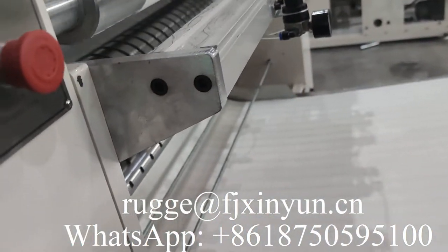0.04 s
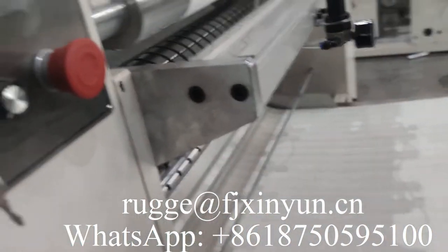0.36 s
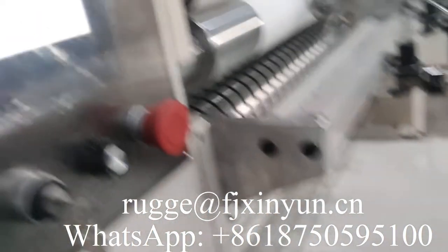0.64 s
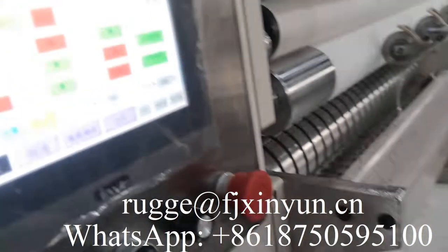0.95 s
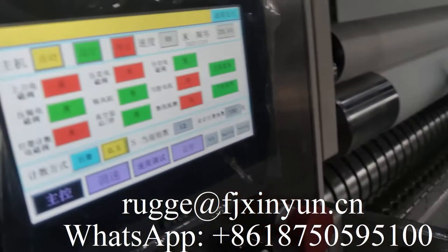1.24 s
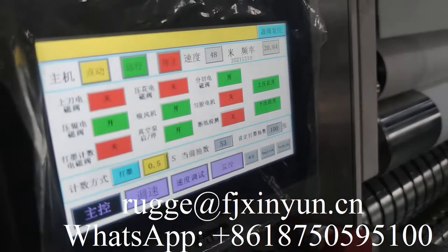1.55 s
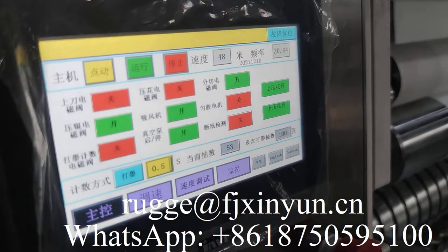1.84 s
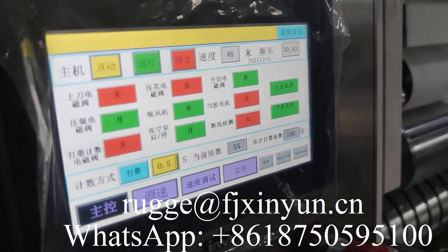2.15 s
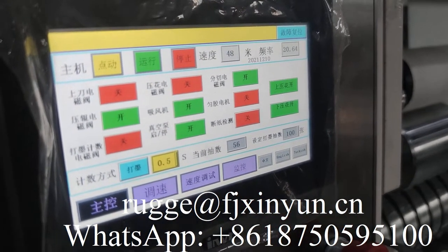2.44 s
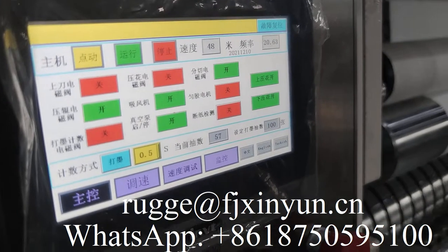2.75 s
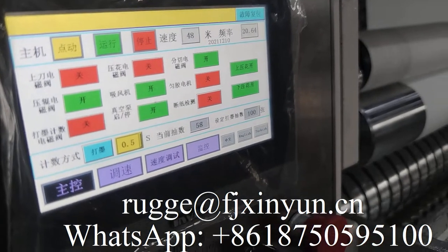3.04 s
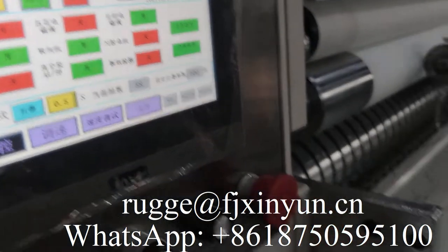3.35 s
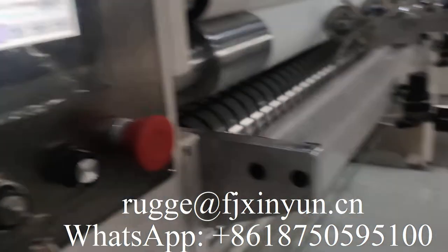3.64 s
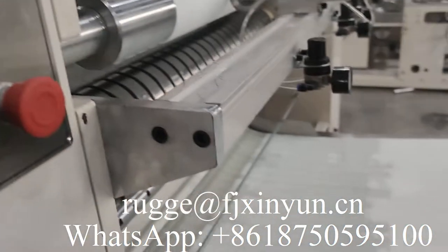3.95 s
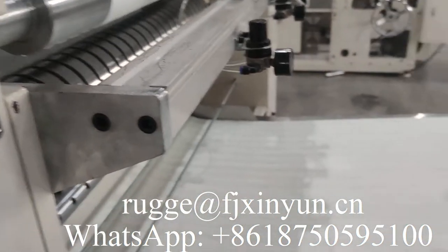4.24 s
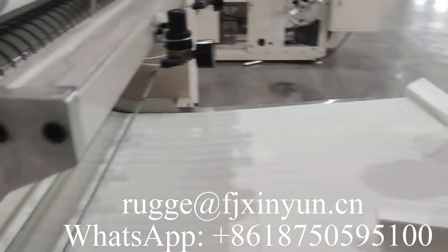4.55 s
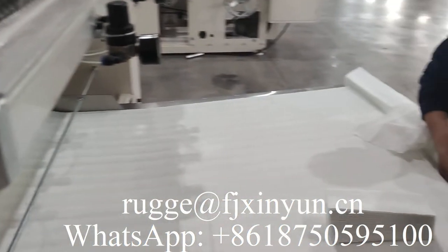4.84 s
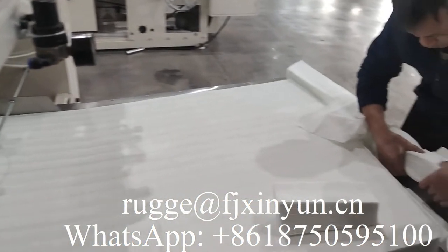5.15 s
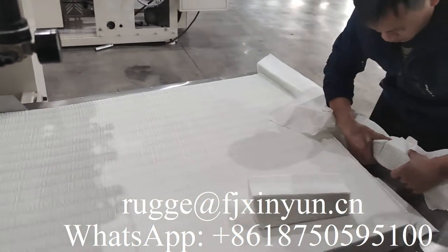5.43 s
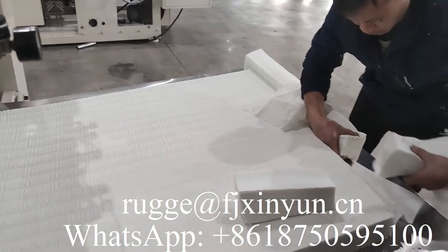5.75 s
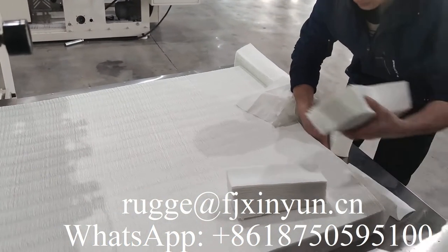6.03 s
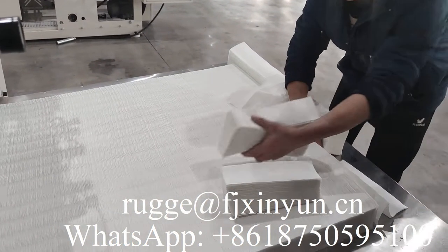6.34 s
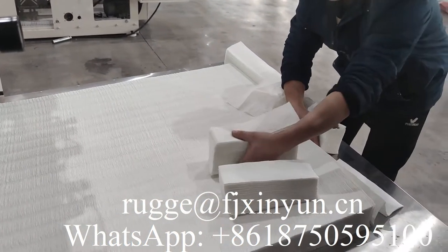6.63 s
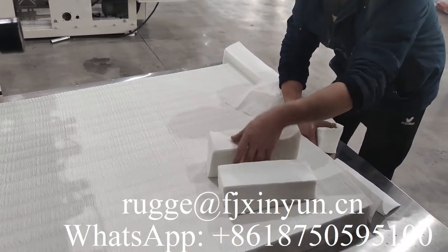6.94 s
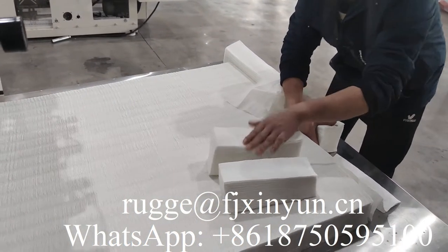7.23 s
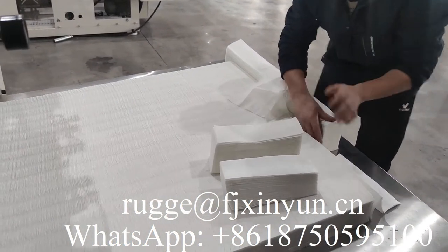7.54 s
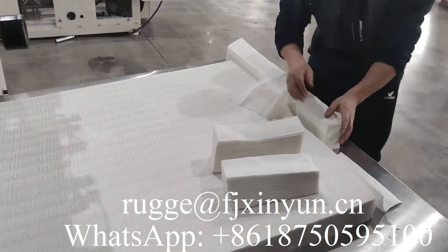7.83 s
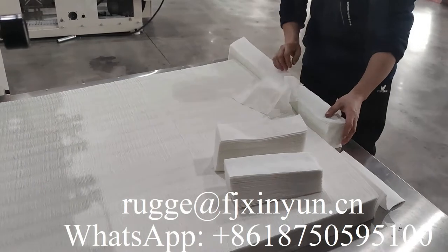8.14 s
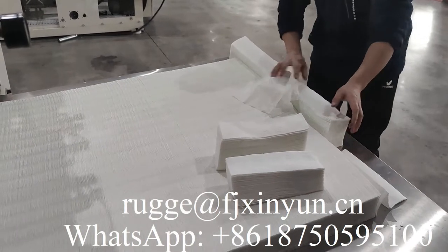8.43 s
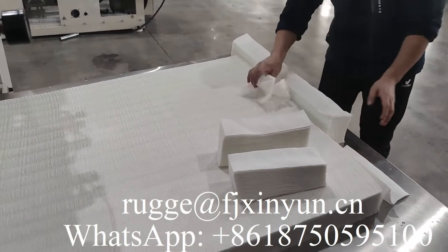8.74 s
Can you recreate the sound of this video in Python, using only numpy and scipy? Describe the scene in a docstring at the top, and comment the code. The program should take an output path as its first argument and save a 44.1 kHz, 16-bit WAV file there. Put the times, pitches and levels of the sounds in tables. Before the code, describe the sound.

A paper towel folding machine runs loudly in a factory, with a droning blower, rhythmic clacking and pulsing air hiss.

```python
"""A droning vacuum blower and sheets slapping down 3.5 times a second: a paper towel folder in a hall.
On each turn of the folding rollers the valve gear knocks, air spits from the suction holes, and the
vacuum port opens with a rush and shuts with a click. Paper catching on steel squeals now and then.
The listening phone, hand-held, ducks behind the control panel, comes out and turns to the table."""
import sys
import numpy as np
from scipy import signal
from scipy.fft import rfft, irfft
from scipy.io import wavfile
from scipy.ndimage import uniform_filter1d

SR = 44100
rng = np.random.default_rng(int(sys.argv[2]) if len(sys.argv) > 2 else 0)


def master_out(mix):
    """Clip the mix to full scale and print it as 16-bit PCM to the path in sys.argv[1]."""
    frames = np.transpose(np.atleast_2d(mix))
    ceiling = np.clip(frames, -1, 1)
    pcm = np.round(ceiling * 32767).astype(np.int16)
    wavfile.write(sys.argv[1], SR, pcm)


N = 396018
T = np.arange(N) / SR
FOLD_S, FIRST_FOLD_S = .286153, .159


def undb(db):
    """Decibels to gain."""
    return 10 ** (np.asarray(db) / 20)


def unit(x):
    """Scale to rms 1."""
    return x / np.sqrt(np.mean(x ** 2))


def colour(x, points):
    """Filter by a spectrum of (f/Hz, gain/dB) points."""
    hz, db = np.transpose(points)
    f = np.maximum(np.arange(N // 2 + 1) * SR / N, 1)
    return irfft(rfft(x) * undb(np.interp(np.log(f), np.log(hz), db)), N)


def ring(x, hz, width_hz):
    """One resonance, gain 1 at its centre."""
    return signal.lfilter(*signal.iirpeak(hz, hz / width_hz, fs=SR), x)


def walk(rate_hz):
    """Smooth random wander, rms 1."""
    k = int(SR / rate_hz)
    steps = np.repeat(rng.standard_normal(N // k + 1), k)
    return unit(uniform_filter1d(uniform_filter1d(steps, k), k)[:N])


def diffuse(alike_hz=620):
    """Noise from all around, 0 dB per Hz: the microphones share the bass, not the treble."""
    f = np.arange(N // 2 + 1) * SR / N
    alike = np.exp(-(f / alike_hz) ** 2)
    mid, side = rfft(rng.standard_normal((2, N)))
    mid, side = mid * np.sqrt(1 + alike), side * np.sqrt(1 - alike)
    return irfft(np.array([mid + side, mid - side]), N) * np.sqrt(SR) / 2


def hiss(hz, width_hz):
    """Noise in one steep-sided resonance, rms 1."""
    return unit(ring(ring(rng.standard_normal(N), hz, 1.7 * width_hz), hz, 1.7 * width_hz))


def blows(per_s):
    """Random unit impacts."""
    return rng.choice([-1, 1], N) * (rng.random(N) < per_s / SR)


def tone(hz, wobble):
    """Slightly unsteady sine, rms 1."""
    return np.sqrt(2) * np.sin(2 * np.pi * np.cumsum(hz * (1 + wobble * walk(120))) / SR)


def burst(t, rise_s, fall_s):
    """Gaussian swell peaking at t = 0."""
    return np.exp(-(t / np.where(t < 0, rise_s, fall_s)) ** 2 / 2)


def since(at_s):
    """Signed time from the nearest passing of one point of the rollers' turn."""
    return (T - FIRST_FOLD_S - at_s + FOLD_S / 2) % FOLD_S - FOLD_S / 2


def stereo(x, lag_s):
    """Direct sound reaches the right microphone later."""
    return np.array([x, np.interp(T - lag_s, T, x)])


def blower(standing_db, lag_s, shaft_hz=74.72, waver_db=0.57):
    """Two lobes push air twice a turn; the lines swell or fade as the phone crosses standing waves."""
    # drone lines: multiple of shaft rate, rms level/dB, share of standing-wave change
    lines = [(1, -46.5, -1.8), (1.5, -36.5, -0.29), (2, -12.5, -0.0066), (3, -57, 0), (3.3, -36.5, 0.085),
             (4, -14.5, 1), (5, -42, -1.1), (6, -41.5, -0.26), (7, -44, -0.26)]
    angle = np.pi / 6 + 2 * np.pi * np.cumsum(shaft_hz * (1 + 0.00046 * walk(5.37))) / SR
    drone = sum(undb(db + share * standing_db + waver_db * walk(12)) * np.cos(multiple * angle)
                for multiple, db, share in lines)
    return stereo(np.sqrt(2) * drone, .00013 + 0.15 * lag_s)


def drive(swell_db=1.7, flutter_db=0.74, split_hz=900):
    """Rollers, belts and other machines rumble; the bass swells, the treble stays more even."""
    # rumble spectrum: f/Hz, density/dB
    spectrum = [(20, -72), (40, -63.5), (65, -50), (110, -51.5), (180, -47), (260, -45.5), (350, -53),
                (480, -57), (720, -57), (900, -60.5), (1600, -59.5), (2600, -57.5), (5000, -63),
                (16000, -89.5)]
    rumble = colour(diffuse(), spectrum)
    bass = signal.sosfiltfilt(signal.butter(2, split_hz, fs=SR, output="sos"), rumble)
    return bass * undb(swell_db * walk(18)) + (rumble - bass) * undb(flutter_db * walk(30))


def air(turbulence_db=0.7, mid_open_s=0.1522, half_open_s=0.029, gulp_db=-56, covered_db=-3):
    """Steady leaks, spits from the suction holes and the rush through the open vacuum port."""
    # spits: t in turn/s, rise/s, fall/s, level/dB
    spits = [(0.083, 0.035, 0.036, 3.5), (.124, 0.0039, 0.016, 2.5), (.257, 0.019, 0.016, 1)]
    # spectra of leak, spit and port rush: f/Hz, density/dB
    leak_spectrum = [(900, -71), (1600, -65), (2100, -51), (2800, -61.5), (3900, -59.5), (4800, -62),
                     (6300, -70), (8000, -63.5), (12000, -65.5), (16000, -87)]
    spit_spectrum = [(1500, -94), (4000, -62.5), (6500, -71), (8500, -63.5), (12000, -66.5), (16000, -85.5)]
    rush_spectrum = [(1200, -75), (2000, -62.5), (2800, -94), (4000, -62), (4800, -60.5), (6500, -60),
                     (8500, -66), (11000, -91), (16000, -84)]
    spit_power = sum((undb(db) * burst(since(at), rise, fall)) ** 2 for at, rise, fall, db in spits)
    t = since(mid_open_s)
    port_open = np.clip((half_open_s - abs(t)) / 0.0057, 0, 1)
    # as the vacuum is spent, the bright rush gives way to a lower gulp
    rush = undb(-45 * t) * colour(diffuse(), rush_spectrum)
    gulp = undb(gulp_db + 27 * t) * ring(diffuse(), 2680, 930)
    # the leak is covered just before the port opens
    leak = colour(diffuse(), leak_spectrum) * undb(covered_db * burst(since(0.12), 0.058, .008))
    spit = np.sqrt(spit_power) * colour(diffuse(), spit_spectrum)
    turbulence = undb(turbulence_db * walk(400) + 0.25 * walk(10))
    return (leak + spit + port_open * (rush + gulp)) * turbulence


def gap_ring(width_hz):
    """Noise ringing in the gap behind the panel, rms 1; the pitch falls as the phone moves along it."""
    # gap resonance: t/s, f/Hz
    glide = [(.9, 1640), (3.6, 1560), (4.3, 1250)]
    angle = 2 * np.pi * np.cumsum(np.interp(T, *np.transpose(glide))) / SR
    lowpass = signal.butter(2, width_hz / 2, fs=SR, output="sos")
    in_phase, quadrature = signal.sosfilt(lowpass, rng.standard_normal((2, N)))
    return unit(in_phase * np.cos(angle) + quadrature * np.sin(angle))


def rollers(air_db, gap_db, whirr_db=-34, chink_db=-34.5, whistle_db=-22.5, flicker_db=2.8):
    """Paper runs over the rollers, combs chink in their grooves, each leaving sheet whistles."""
    # resonances of rollers and steel combs: f/Hz, width/Hz, level/dB
    roller_modes = [(500, 390, -34.5), (704, 170, -36.5), (1020, 280, -36.5)]
    comb_modes = [(2020, 110, -2), (2160, 250, 0), (2316, 80, 3), (2424, 66, -14.5)]
    run = sum(undb(db + flicker_db * walk(30)) * hiss(hz, width) for hz, width, db in roller_modes)
    whirr = undb(whirr_db + gap_db) * gap_ring(width_hz=330)
    chinks = unit(sum(undb(db) * ring(ring(blows(per_s=330), hz, width), hz, 8 * width)
                      for hz, width, db in comb_modes))
    whistle = undb(whistle_db) * burst(since(0.049), rise_s=.019, fall_s=.022) * hiss(3745, 190)
    return run + whirr + undb(air_db) * (undb(chink_db) * chinks + whistle)


def web(level_db=-33, lag_s=0.00046):
    """The paper web rustles from the left."""
    return stereo(undb(level_db + 1.3 * walk(25)) * hiss(1320, 350), lag_s)


def whine(level_db=-47):
    """Faint steady whine of the drive."""
    return undb(level_db) * tone(hz=2804, wobble=0.00397)


def valve(scatter_db=1, jitter_s=0.00046, attack_s=0.00029):
    """The valve gear knocks at the same points of every turn; each knock rings briefly."""
    # knocks: t in turn/s, f/Hz, t60/s, level/dB
    knocks = [(.088, 473, 0.025, -16), (.1865, 2140, 0.02, -15), (.190, 1256, 0.064, -22)]
    out = np.zeros(N)
    turns = np.arange(-1, N / SR / FOLD_S)
    for at, hz, t60, db in knocks:
        for turn, (late, size, detune) in zip(turns, rng.standard_normal((len(turns), 3))):
            start = int((FIRST_FOLD_S + turn * FOLD_S + at + jitter_s * late) * SR)
            if 0 <= start < N:
                t = T[:min(SR // 10, N - start)]
                envelope = undb(db + scatter_db * size - 60 * t / t60) * (1 - np.exp(-t / attack_s))
                ringing = np.sin(2 * np.pi * hz * (1 + 0.02 * detune) * t)
                out[start:start + len(t)] += 2 * envelope * ringing
    return out


def slaps(level_db, gap_db, at_s=.049, jitter_s=.002, boom_db=0.3, crack_db=-12.5, tail_db=-5):
    """Once a turn a sheet lands: small blows boom between the rollers and ring behind the panel."""
    # slap resonances: f/Hz, width/Hz, relative level/dB
    slap_modes = [(527, 290, -3.5), (750, 250, 3.5), (952, 220, -0.5), (1280, 280, -10)]
    level_scatter_db, crack_scatter_db, mode_scatter_db = 1.1, 3, 3
    flurry = blows(per_s=3200)
    modes = np.array([undb(db) * ring(ring(flurry, hz, width), hz, 3 * width)
                      for hz, width, db in slap_modes])
    gap_noise = gap_ring(width_hz=260) * undb(crack_db + gap_db)
    out = np.zeros(N)
    landings_s = np.arange(FIRST_FOLD_S + at_s, N / SR, FOLD_S)
    sheets = rng.standard_normal((len(landings_s), 3))
    spots = rng.standard_normal((len(landings_s), len(modes)))
    for landing_s, (late, size, bright), spot in zip(landings_s, sheets, spots):
        near = abs(T - landing_s) < FOLD_S / 2
        t = T[near] - landing_s - jitter_s * late
        hit = burst(t + 0.0026, rise_s=0.009, fall_s=0.014)
        tail = undb(tail_db) * burst(t - .005, rise_s=0.025, fall_s=0.028)
        envelope = np.hypot(hit, tail)
        # the landing spot sets the mix of resonances, not their total energy
        boom = undb(mode_scatter_db * spot) @ modes[:, near]
        boom *= undb(boom_db) / np.sqrt(np.average(boom ** 2, weights=envelope ** 2))
        crack = undb(crack_scatter_db * bright) * gap_noise[near]
        out[near] += undb(level_scatter_db * size) * envelope * (boom + crack)
    return out * undb(level_db)


def squeals():
    """Paper catches briefly on the steel."""
    # catches: t/s, f/Hz, half length/s, level/dB
    catches = [(1.49, 3330, 0.016, -31), (7.183, 2270, .028, -29), (8.034, 2280, .022, -27)]
    return sum(undb(db) * burst(T - at, half_s, half_s) * tone(hz, wobble=0.0065)
               for at, hz, half_s, db in catches)


def hall(x, level_db=-11, t60_s=0.067):
    """Reflections off machine frame, table and floor die away quickly."""
    t = T[:SR]
    echo = diffuse()[:, :SR] * undb(-60 * t / t60_s) * (t > .002)
    echo /= np.sqrt(np.sum(echo ** 2) / 2)
    return undb(level_db) * signal.fftconvolve(x[None], echo, axes=1)[:, :N]


def scene():
    """The panel shades air and slaps and rings in its gap; turning lifts the hiss, thins the drone."""
    # phone behind the control panel: t/s, hidden/0-1
    ducking = [(.6, 0.14), (1.25, 1), (3.1, 0.93), (3.8, 0)]
    # swing from rollers to delivery table: t/s, turned/0-1
    swing = [(3.9, 0.06), (4.4, 0.2), (4.9, 0.74), (5.4, 1)]
    hidden = np.interp(T, *np.transpose(ducking))
    turned = np.interp(T, *np.transpose(swing))
    air_db = -4 - 1.7 * hidden + 4 * turned
    gap_db = 0.5 + 4 * hidden - 17 * turned
    slap_db = -16.5 - 3 * hidden - 0.15 * turned
    standing_db = 0.47 - 4 * turned
    lag_s = .00012 + 0.00033 * turned
    shadow_db = 3 * turned  # the phone's body shades the right microphone from the slaps
    balance = undb(np.array([[.5], [-.5]]) * shadow_db)
    sheets = slaps(slap_db, gap_db)
    running = valve() * undb(0.9 * air_db) + rollers(air_db, gap_db) + squeals() + whine()
    direct = stereo(sheets, lag_s) * balance + stereo(running, lag_s) + web()
    echoes = hall(sheets + running)
    return blower(standing_db, lag_s) + direct + echoes + air() * undb(air_db) + drive()


def record(dry, top_hz=15900):
    """Each microphone port colours the treble; peaks clip at full scale and the top is cut."""
    # port responses: f/Hz, gain/dB
    left_port = [(900, 0), (2000, -4), (3800, -6.5), (5000, -3), (6300, -4), (7100, 6), (8100, 11),
                 (9000, 6.5), (10000, 6.5), (11200, 2), (11900, 9), (13000, 8.5), (15500, 15.5)]
    right_port = [(900, 0), (2000, 0), (5000, 0.5), (6300, 0), (7100, -8), (8200, -16), (9300, -8.5),
                  (11500, -7.5), (13000, -2.5), (14000, 12), (15500, 11)]
    heard = np.array([colour(dry[0], left_port), colour(dry[1], right_port)])
    lowpass = signal.ellip(10, .2, 80, top_hz, fs=SR, output="sos")
    return signal.sosfilt(lowpass, np.clip(heard, -1, 1))


dry = scene()
out = record(dry)
master_out(out)
```